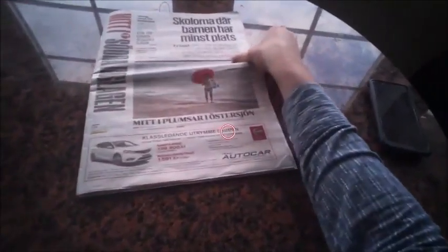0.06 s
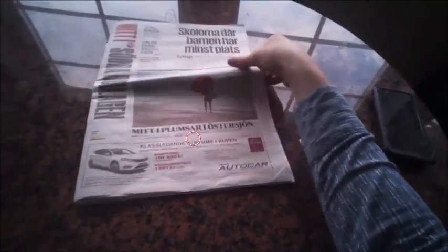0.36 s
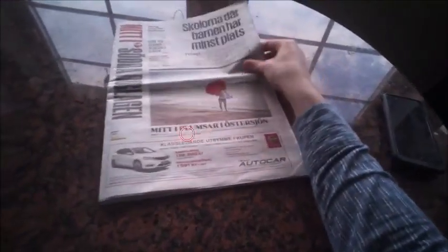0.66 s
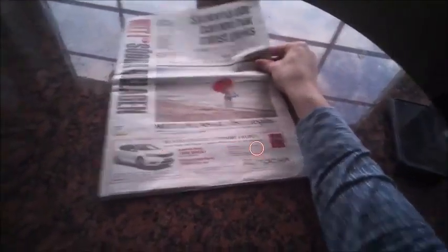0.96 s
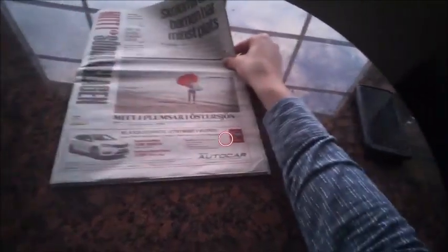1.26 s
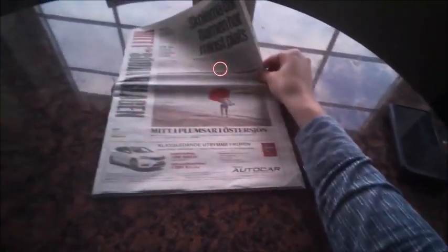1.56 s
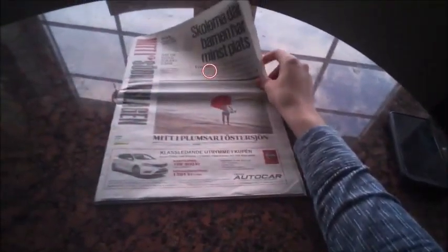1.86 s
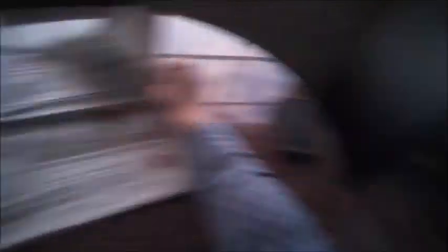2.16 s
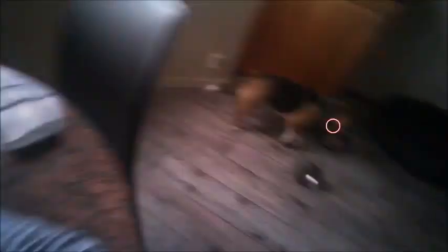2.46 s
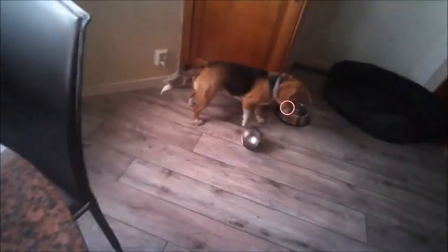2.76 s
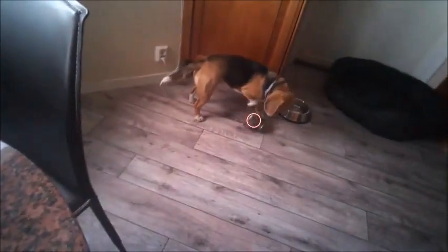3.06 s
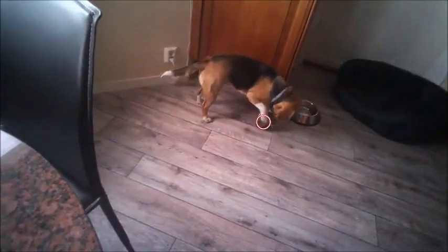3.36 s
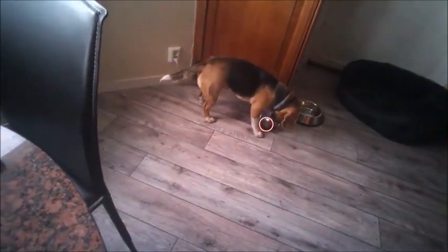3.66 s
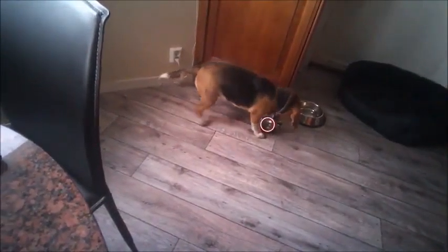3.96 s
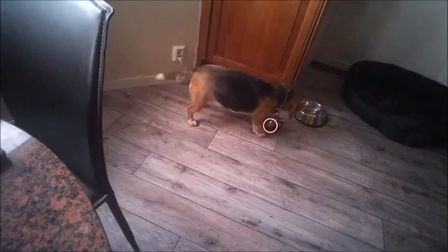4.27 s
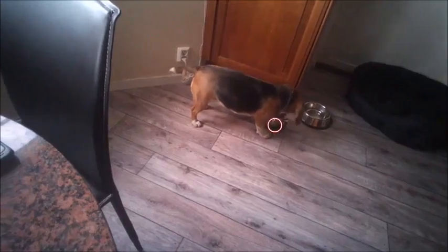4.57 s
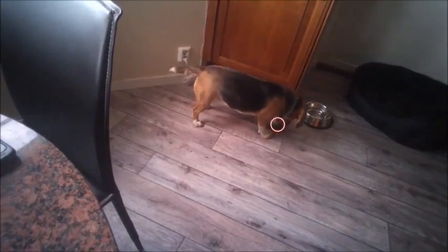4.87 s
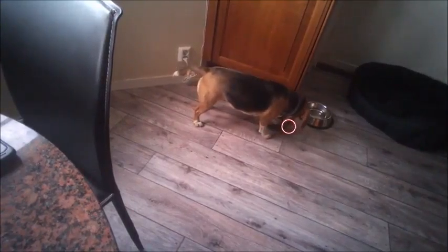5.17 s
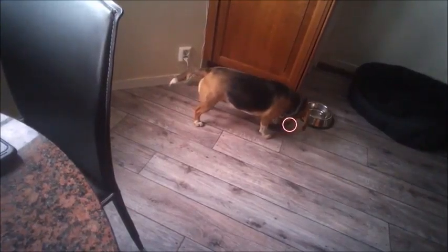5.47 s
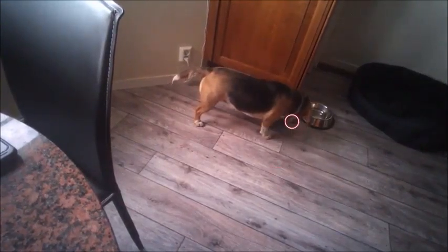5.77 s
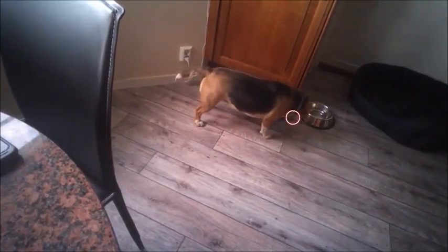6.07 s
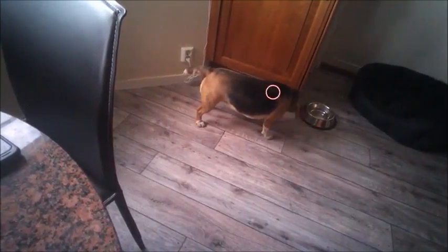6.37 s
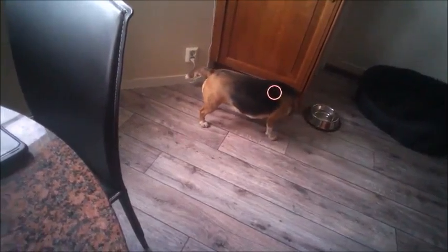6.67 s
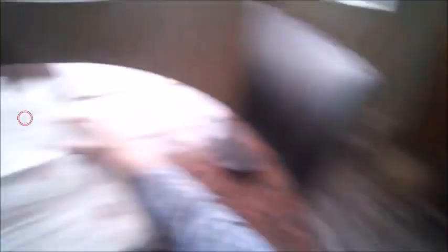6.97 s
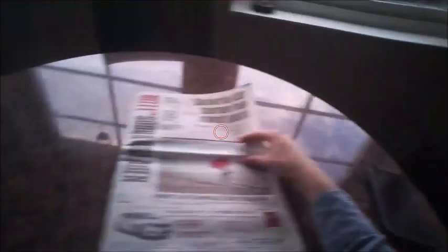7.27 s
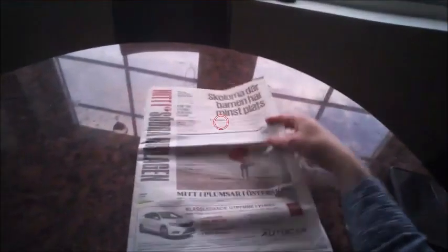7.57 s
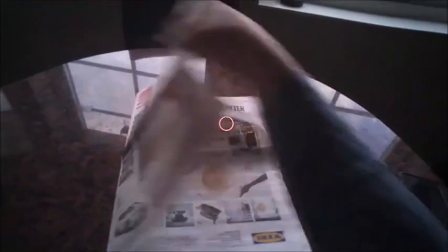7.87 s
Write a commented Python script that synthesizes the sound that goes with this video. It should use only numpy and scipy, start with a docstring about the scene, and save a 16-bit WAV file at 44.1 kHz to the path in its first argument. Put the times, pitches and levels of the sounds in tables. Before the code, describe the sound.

In a quiet room, a hard ball rolls and knocks hollowly on a plank floor as a dog pushes it about, while a newspaper crinkles and snaps sharply close by. The dog then crunches softly a few metres off, claws ticking, its metal bowls clinking and ringing. Finally a bowl scrapes and rattles with a dull thud, and the nearby paper crackles loudly and swishes over. The sound drops out for an instant about once a second.

```python
"""A hard ball rumbles and bumps over a plank floor, nosed along by a dog a few metres off.
Close by, a newspaper crackles as its fibres rub, and snaps loudly once as a crease buckles.
The dog crunches, its claws and teeth tick, and its steel bowls and collar tag clink and ring.
At last a bowl is shoved rattling along the floor, a cabinet thuds and a page is turned.
Faint hiss and hum lie underneath; the sound cuts out for an instant about once a second."""
import sys
import numpy as np
from scipy import signal
from scipy.fft import rfft, irfft
from scipy.io import wavfile
from scipy.ndimage import uniform_filter1d

SR = 44100
rng = np.random.default_rng(int(sys.argv[2]) if len(sys.argv) > 2 else 0)


def dump_mix(stems):
    """Bounce the given channels to the path in sys.argv[1] as a 16-bit WAV at rate SR."""
    frames = np.atleast_2d(stems).T  # one column per channel
    limited = np.clip(frames, -1, 1)  # hard clip at full scale
    pcm = np.round(limited * 32767).astype(np.int16)
    wavfile.write(sys.argv[1], SR, pcm)


N = 357385
AGE_S = np.arange(int(.8 * SR)) / SR

ROLLS = [(0, 1, -65), (1.56, 0.15, -47), (1.88, 0.62, -57), (2.76, 0.31, -60), (3.68, .52, -68.5),
         (5.71, 0.048, -63.5), (6.45, 0.53, -68)]   # pushes: t/s, length/s, level/dB
RUMBLE_SPECTRUM = [(41, -47), (70, -17), (95, -7.5), (145, 0.5), (158, -2.5), (232, -20.5), (296, -18.5),
                   (337, -16.5), (587, -25.5), (900, -28), (1170, -54), (1980, -120)]   # f/Hz, level/dB
KNOCKS = [(0.095, -60.5, -25), (0.308, -51, -10), (.565, -66.5, -21), (1.482, -52, -12), (1.573, -46, -1),
          (1.609, -54.5, 8), (1.672, -42.5, 2), (1.718, -51, 3.5), (2.086, -45.5, -8.5),
          (2.376, -58.5, -13), (2.642, -52.5, -16), (2.746, -43.5, -19), (3.2542, -38, -14.5),
          (6.312, -59, -6), (7.095, -50, 3)]   # floor knocks: t/s, boom/dB, hollow ring/dB re boom
PLANK_MODES = [(99.5, -10, 0.47), (127.4, -4.5, 0.46), (152.7, 4.5, 0.41), (189.1, -7.5, 0.41),
               (232.3, -9, 0.25), (401.6, -16, 0.55), (534, -15, 0.25), (541, -34.5, 0.47)]   # f/Hz, level/dB, t60/s
HOLLOW_MODES = [(176, 3.5, 0.23), (221.2, -4.5, 0.35), (238.1, -7, 0.41), (324, -2, 0.29),
                (375.7, -13.5, 0.44), (418, -7.5, 0.21)]   # f/Hz, level/dB, t60/s
def ball_and_knocks():
    """The ball rumbles; hollow knocks boom and clack on the planks: its bumps, last the bowl landing."""
    rolling = swell(ROLLS, attack_s=.025, release_s=0.074, fade_db_per_s=7.5)
    out = rolling * texture(RUMBLE_SPECTRUM, per_s=200, spread_db=2.5, wet_db=9)
    even_db, clack_growth = -36.5, 1.72   # harder knock, shorter contact: clack outgrows boom
    for s, boom_db, ring_db in KNOCKS:
        add(out, s, at_level(ringing(PLANK_MODES, vary_db=4.1) * rise(0.014), boom_db))
        add(out, s, at_level(ringing(HOLLOW_MODES, vary_db=1.3) * rise(0.0073), boom_db + ring_db))
        add(out, s, clack(even_db + clack_growth * (boom_db - even_db)))
    return out


CLACK_SPECTRUM = [(80, -25.5), (200, 0), (300, -8.5), (450, 1.5), (700, -8.5), (950, -7.5), (1200, -12),
                  (1600, -7.5), (2400, -15.5), (3300, -33.5), (4200, -44), (5100, -37.5), (6500, -78),
                  (11000, -47)]   # f/Hz, level/dB
def clack(db):
    """A hard contact with the floor, heard across the room."""
    return at_level(through(pulse(CLACK_SPECTRUM), room(wet_db=9.3)), db)


# large bowl: t/s, level/dB, touch low-pass/Hz, clang/dB re ring, muzzle damping (1 = free)
BOWL_HITS = [(2.889, -75.5, 5800, -1, 0.51), (3.2555, -53, 1310, -16, 0.84), (4.377, -53.5, 4970, -1, 1.43),
             (4.387, -47, 15000, -2.5, 2.4), (5.11, -72, 15000, -3, 1.6)]
BOWL_MODES = [(790, -19, .4), (1300, -13, .45), (1360.5, -3, .8), (1810, -13, .5), (2016, -2, 1.3),
              (2150, -7, .5), (2826, -6.5, .95), (3068, -11, .8), (3704, -12, .8), (4610, -14, .8),
              (4990, -14, .7), (5240, -15, .8), (5739, -16, .8), (6950, -14, .85), (8274, -6, .85),
              (8356, -7, .7), (9320, -7, .7), (9505, -6, .75), (9921, -16, .75), (10130, -15, .6),
              (10706, -8, .6), (10900, -11, .6), (11210, -11, .7)]   # f/Hz, level/dB, free t60/s
SMALL_BOWL_HITS = [(1.432, -59), (5.602, -63.5), (5.801, -75), (6.24, -75), (6.503, -62.5)]   # t/s, level/dB
SMALL_BOWL_MODES = [(807, -8, .4), (1565, 0, .6), (1870, -3, .5), (2000, 0, .5), (2235, -4, .35),
                    (2850, -6, .45), (3620, -11, .45), (4043, -11, .3), (5496, -10, .5), (5631, -14, .4),
                    (6890, -10, .5), (8000, -12, .45), (8760, -17, .4), (9523, -9, .4), (10205, -15, .5),
                    (10640, -11, .4)]   # f/Hz, level/dB, free t60/s
TAG_HITS = [(1.326, -60.5), (5.02, -83.5), (6.381, -75)]   # t/s, level/dB
TAG_MODES = [(3630, 5, 0.34), (8800, 2, 0.34), (9916, -12, .35), (11000, 13, 0.46), (11400, -12, .32),
             (10970, 1.5, 0.31), (10100, -16, 0.76)]   # f/Hz, level/dB, free t60/s
def clinks():
    """Touches ring two bowls and the collar tag; the small bowl rocks back and clinks again."""
    out = np.zeros(N)
    for s, db, cutoff_hz, clang_db, damping in BOWL_HITS:
        soft_touch = signal.butter(4, cutoff_hz, fs=SR, output="sos")
        hit = steel(BOWL_MODES, clang_damping=46, clang_db=clang_db, tick_db=-12, ring_damping=damping)
        add(out, s, at_level(signal.sosfilt(soft_touch, hit), db))
    rock_s, rock_loss_db = 0.032, 1.5
    for s, db in SMALL_BOWL_HITS:
        for k in range(2):
            hit = steel(SMALL_BOWL_MODES, clang_damping=19, clang_db=7, tick_db=-15.5)
            add(out, s + k * rock_s, at_level(hit, db - k * rock_loss_db))
    for s, db in TAG_HITS:
        add(out, s, at_level(steel(TAG_MODES, clang_damping=52, clang_db=14, tick_db=-21.5), db))
    return out


def steel(modes, clang_damping, clang_db, tick_db, ring_damping=1):
    """Struck steel: pure ringing, plus the contact's brief clang and tick scattered by the room."""
    highpass = signal.butter(4, 1200, "high", fs=SR, output="sos")
    contact = signal.sosfilt(highpass, ringing(modes, vary_db=1, damping=clang_damping))
    tick = pulse(CRISP_SPECTRUM)
    add(contact, 0, from_db(tick_db) * tick * np.linalg.norm(contact) / np.linalg.norm(tick))
    clang = through(contact, room(wet_db=14))[:len(AGE_S)]
    ring = ringing(modes, vary_db=0.43, damping=ring_damping) * rise(0.00036)
    return at_level(ring, 0) + at_level(clang, clang_db)


SHOVES = [(6.857, .12, -42.5, -50, -1.5), (7.087, .085, -40, -35.5, -9)]   # t/s, length/s, scrape/dB, rattle/dB, fade/dB
SCRAPE_SPECTRUM = [(88, -56), (150, -11), (232, -6.5), (305, 0.5), (346, -8), (438, -3.5), (607, -15),
                   (677, -3.5), (769, -13), (1030, -15.5), (2160, -3), (2890, -11.5), (4310, -33),
                   (9080, -41.5), (11500, -47), (15000, -57), (22000, -120)]   # f/Hz, level/dB
SKID_MODES = [(912, 3, .35), (980, -5, .45), (1292, -7, .25), (1357, -8, .5), (1572, 0, .38),
              (1612, -2, .35), (1655, -3, .3), (1860, -1, .3), (2026, 0, .45), (2312, -1, .45),
              (2390, 1, .35), (2455, -1, .4), (3075, -6, .65), (3203, -9, .36), (3305, -9, .35),
              (3709, -19, .45), (4247, -16, .4), (4635, -18, .3), (5290, -13, .45), (6514, -28, .37),
              (8376, -24, .34), (9453, -23, .25)]   # f/Hz, level/dB, free t60/s
def skids():
    """A shoved bowl's rim clacks, then chatters on the floor, scraping and setting the steel ringing."""
    out = np.zeros(N)
    for s, length_s, scrape_db, rattle_db, fade_db in SHOVES:
        count = round(length_s * SR)
        chatter = grains(per_s=1800, spread_db=2.3, count=count)
        chatter *= from_db(np.linspace(0, fade_db, count))
        add(out, s, clack(scrape_db - 0.5))
        scrape = through(chatter, pulse(SCRAPE_SPECTRUM), room(wet_db=-3.1))
        rattle = through(chatter, ringing(SKID_MODES, vary_db=0.96, damping=21), room(wet_db=-1.2))
        ring = ringing(SKID_MODES, vary_db=0.91) * rise(0.039)
        add(out, s, at_level(scrape, scrape_db))
        add(out, s, at_level(rattle, rattle_db))
        add(out, s, at_level(ring, rattle_db - 11.5))
    return out


CABINET_MODES = [(41, -10, .25), (61.4, -17, 0.17), (88, -4, 0.26), (113.3, -4, 0.22), (135.5, 2.5, 0.19)]   # f/Hz, level/dB, t60/s
def cabinet():
    """One heavy bump rings the cabinet's low modes: a dull thud."""
    out = np.zeros(N)
    thud = ringing(CABINET_MODES, vary_db=0.84) * rise(0.011)
    add(out, s=7.112, sound=at_level(thud, db=-40.5))
    return out


NOSING = [(3.712, 0.48, -71, -21), (5.576, 0.59, -67.5, -1), (6.52, 0.32, -63.5, -8)]   # bouts: t/s, length/s, base level/dB, bowl offset/dB
TICKS = [(3.482, -42.5), (3.924, -47.5), (4.051, -52.5), (4.128, -52), (5.602, -53), (5.967, -47),
         (6.155, -55), (6.313, -44), (6.48, -52), (6.623, -37), (6.728, -46.5)]   # claws and teeth: t/s, base level/dB
CRUNCH_SPECTRUM = [(350, -24.5), (600, -11), (859, -16.5), (1480, -3), (2140, 1.5), (3470, -24.5),
                   (4500, -28.5), (5410, -24), (6510, -48), (8660, -29), (11500, -48), (15000, -46),
                   (22000, -120)]   # f/Hz, level/dB
def dog():
    """Small uneven crunches, the soft muzzle brushing the bowls, and ticks of claws and teeth."""
    attack_s, release_s = 0.024, 0.26
    crunching = swell([row[:3] for row in NOSING], attack_s, release_s)
    out = crunching * from_db(-3) * texture(CRUNCH_SPECTRUM, per_s=56, spread_db=2, wet_db=3)
    brushes = [(s, length_s, db + bowl_db) for s, length_s, db, bowl_db in NOSING]
    bowls = ringing(SMALL_BOWL_MODES, vary_db=3.3) + from_db(-6.5) * ringing(BOWL_MODES, vary_db=2.3)
    soft_muzzle = signal.butter(1, 5000, fs=SR, output="sos")
    brushed = signal.sosfilt(soft_muzzle, through(grains(per_s=60, spread_db=1.8), bowls))
    out += swell(brushes, attack_s, release_s) * from_db(-6.5) * rms_one(brushed)
    for s, db in TICKS:
        contact = burst(per_s=3000, spread_db=2.9, decay_s=0.0021)
        tick = through(contact, pulse(CRUNCH_SPECTRUM), room(wet_db=2.6))
        add(out, s, at_level(tick, db - 9))
    return out


RUSTLES = [(0, 0.6, -71.5), (.91, 0.013, -55), (1.44, 1.3, -66), (7.34, 0.46, -58), (7.43, 0.086, -53),
           (7.745, 0.085, -47)]   # hand slides or bends the sheet: t/s, length/s, level/dB
PAPER_SPECTRUM = [(120, -50), (200, -20), (276, -28.5), (436, -15.5), (750, -16.5), (817, -12.5),
                  (1610, -5), (1910, -1), (2960, -12.5), (4230, -27.5), (5100, -21), (6460, -35.5),
                  (9710, -27.5), (11500, -47), (15000, -84), (22000, -120)]   # f/Hz, level/dB
SNAPS = [(0.265, -54, 0.034), (0.606, -47, 0.97), (.771, -49, .7), (0.847, -46, 0.93), (.917, -43, .8),
         (.955, -35, 0), (.9715, -10, 0.18), (2.256, -46, 0.55), (2.304, -44, 0.24), (2.356, -45, 0.16),
         (2.4154, -44, 0), (7.068, -32.5, 0.34), (7.415, -31.5, 0.81), (7.435, -42, 0.36), (7.4566, -24, 0),
         (7.463, -20, 0.32), (7.533, -26, 0.5), (7.5744, -20.5, 0.14), (7.61, -32.5, 0.35),
         (7.701, -31, 0.52), (7.744, -31, 0.003)]   # creases: t/s, dry click peak/dB, slack (0 = taut, 1 = limp)
SNAP_SPECTRUM = [(300, -34.5), (800, -17), (1200, -5), (2100, 0), (2700, -5), (3300, -14), (4000, -31),
                 (6000, -46.5), (11000, -40)]   # f/Hz, level/dB
CRISP_SPECTRUM = [(2500, -30), (3800, -4), (5100, -3), (6500, -13), (8700, -2.5), (11000, -19.5)]   # paper sizzle, also the tick on steel: f/Hz, level/dB
FLAP_SPECTRUM = [(100, -16.5), (300, -5), (650, -6), (900, -4), (1200, 7.5), (1600, 3.5), (2500, -32.5),
                 (5000, -57)]   # f/Hz, level/dB
def newspaper():
    """Rubbing fibres crackle; a buckling crease snaps, with a sizzle if taut and a dull flap if limp."""
    handling = swell(RUSTLES, attack_s=0.022, release_s=0.093)
    out = handling * texture(PAPER_SPECTRUM, per_s=500, spread_db=2.5, wet_db=-0.5)
    click, crisp, flap = pulse(SNAP_SPECTRUM), pulse(CRISP_SPECTRUM), pulse(FLAP_SPECTRUM)
    sizzle_max_db = -38.5   # only so many folds can give way
    for s, db, slack in SNAPS:
        flap_db = np.interp(slack, [0, 1], [-24, 3.5])
        sizzle_db = min(np.interp(slack, [0, 1], [-13, -27.5]), sizzle_max_db - db)
        folds = burst(per_s=9000, spread_db=1, decay_s=0.0036)
        sizzle = through(folds, crisp)
        snap = from_db(sizzle_db) * sizzle / np.abs(sizzle).max() + from_db(-24) * through(folds, click)
        add(snap, 0, click + from_db(flap_db) * flap)
        add(out, s, from_db(db) * through(snap, room(wet_db=-4.5)))
    return out


PAGE_SWEEP = [(7.765, 0.046, -43.5)]   # t/s, length/s, level/dB
def page_turn():
    """Sheet slides on sheet: contacts so dense that they merge into a swish."""
    sweep = swell(PAGE_SWEEP, attack_s=0.019, release_s=0.053)
    return sweep * texture(PAPER_SPECTRUM, per_s=10000, spread_db=3.5, wet_db=7)


AIR_SPECTRUM = [(15, -4), (28, 4), (45, -6), (70, 3), (110, 1.5), (200, -1.5), (400, -6), (750, -10),
                (1050, -16.5), (1600, -11.5), (2300, -10), (3000, -15), (3800, -24), (11000, -27.5)]   # f/Hz, level/dB
def background():
    """Even room hiss and a low hum that wavers in phase and level."""
    air_db, hum_db, hum_hz = -72, -69, 38.4
    air = rms_one(through(rng.standard_normal(N), pulse(AIR_SPECTRUM)))
    slow = signal.butter(2, 3.5, fs=SR, output="sos")
    phase_drift, level_drift = rms_one(signal.sosfilt(slow, rng.standard_normal((2, N + SR)))[:, SR:])
    phase = 2 * np.pi * hum_hz * np.arange(N) / SR + .45 * phase_drift
    hum = rms_one(np.sin(phase) * from_db(3 * level_drift))
    return from_db(air_db) * air + from_db(hum_db) * hum


def room(wet_db, t60_s=0.6, early_db=7, early_s=0.011):
    """Impulse response: direct sound, strong first reflections, then a decaying noise tail."""
    bands = [signal.butter(2, 4000, side, fs=SR, output="sos") for side in ("low", "high")]
    tail = sum(signal.sosfilt(band, rng.standard_normal(len(AGE_S))) for band in bands)
    tail *= from_db(-60 * AGE_S / t60_s)
    tail *= rise(0.0024) * from_db(early_db * np.exp(-AGE_S / early_s))
    response = from_db(wet_db) * tail / np.linalg.norm(tail)
    response[0] = 1
    return response


def ringing(modes, vary_db, damping=1):
    """Decaying sines of a struck body; each blow favours other modes. Damping divides every t60."""
    out = np.zeros(len(AGE_S))
    for hz, db, t60_s in modes:
        envelope = from_db(db + vary_db * rng.standard_normal() - 60 * AGE_S * damping / t60_s)
        out += envelope * np.sin(2 * np.pi * hz * AGE_S) * rng.choice([-1, 1])
    return out


def grains(per_s, spread_db, count=N):
    """Random tiny contacts of uneven size, rms 1."""
    sizes = from_db(spread_db * np.minimum(rng.exponential(1, count), 4))
    return rms_one(sizes * rng.choice([-1, 1], count) * (rng.random(count) < per_s / SR))


def burst(per_s, spread_db, decay_s):
    """A brief, dying cluster of contacts."""
    return grains(per_s, spread_db, count=400) * np.exp(-AGE_S[:400] / decay_s)


def texture(spectrum, per_s, spread_db, wet_db):
    """A steady stream of contacts of one colour, heard in the room; rms 1."""
    return rms_one(through(grains(per_s, spread_db), pulse(spectrum), room(wet_db)))


def pulse(spectrum, size=4096):
    """Minimum-phase click with the given spectrum, peak 1."""
    hz, db = np.transpose(spectrum)
    grid_hz = np.maximum(np.fft.rfftfreq(size, 1 / SR), 1)
    magnitude = from_db(np.interp(np.log(grid_hz), np.log(hz), db))
    cepstrum = irfft(np.log(magnitude))
    cepstrum[1:size // 2] *= 2
    cepstrum[size // 2 + 1:] = 0
    click = irfft(np.exp(rfft(cepstrum)))
    return click / np.abs(click).max()


def swell(moves, attack_s, release_s, fade_db_per_s=0):
    """Gain curve of movements: each rises, holds or slowly fades, and dies away."""
    gain = np.zeros(N)
    for s, length_s, db in moves:
        age_s = np.maximum(np.arange(N) / SR - s, 0)
        release = np.exp(-np.maximum(age_s - length_s, 0) / release_s)
        gain += from_db(db - fade_db_per_s * age_s) * rise(attack_s, age_s) * release
    return gain


def rise(attack_s, age_s=AGE_S):
    """Exponential onset from 0 to 1."""
    return 1 - np.exp(-age_s / attack_s)


def through(x, *responses):
    """Pass x through impulse responses in turn."""
    for response in responses:
        x = signal.fftconvolve(x, response)[:N]
    return x


def add(out, s, sound):
    """Mix a sound in at time s."""
    i = round(s * SR)
    out[i:i + len(sound)] += sound[:N - i]


def at_level(x, db):
    """Scale so that the loudest 10 ms has the given rms level."""
    return x * from_db(db) / np.sqrt(uniform_filter1d(x ** 2, size=441).max())


def rms_one(x):
    """Scale to rms 1."""
    return x / np.sqrt(np.mean(x ** 2) + 1e-20)


def from_db(db):
    """Decibels to gain."""
    return 10 ** (np.asarray(db) / 20)


def scene():
    """All sources, mono."""
    return (ball_and_knocks() + clinks() + skids() + cabinet() + dog() + newspaper() + page_turn()
            + background())[None]


DROPOUTS = [0.978, 2.001, 3.0229, 4.0672, 5.087, 6.1108, 7.156]   # t/s
def record(dry):
    """The sound cuts out for instants, and the top treble is removed."""
    dropout_s, dropout_db, cutoff_hz = 0.01125, -25.5, 11400
    gate = np.ones(N)
    for s in DROPOUTS:
        gate[round(s * SR):round((s + dropout_s) * SR)] = from_db(dropout_db)
    lowpass = signal.ellip(10, .2, 70, cutoff_hz, fs=SR, output="sos")
    return signal.sosfilt(lowpass, dry * uniform_filter1d(gate, size=40))


dry = scene()
out = record(dry)
dump_mix(out)
```